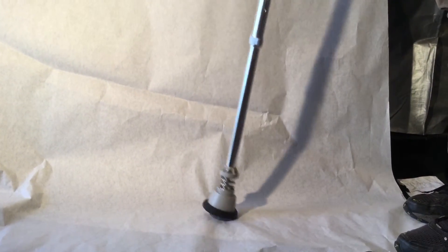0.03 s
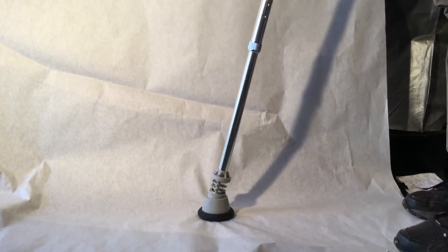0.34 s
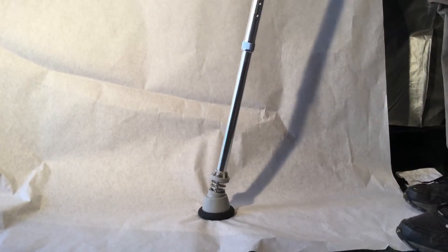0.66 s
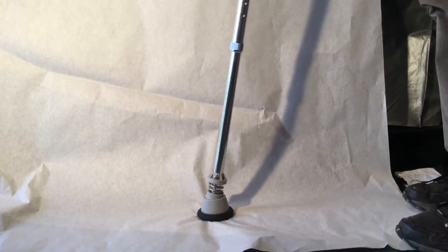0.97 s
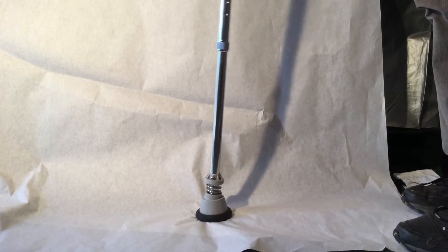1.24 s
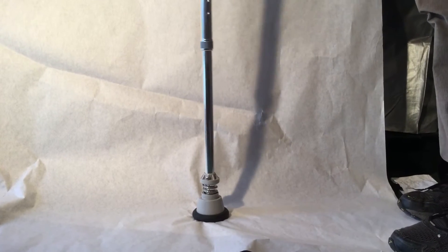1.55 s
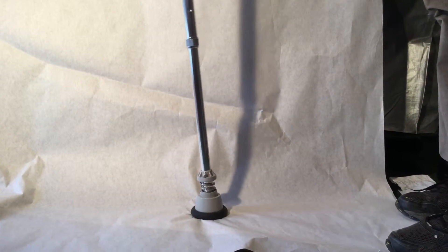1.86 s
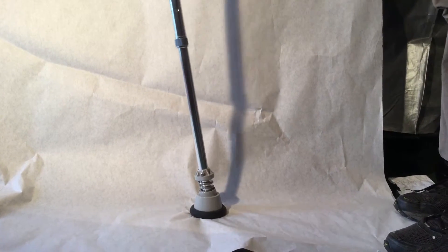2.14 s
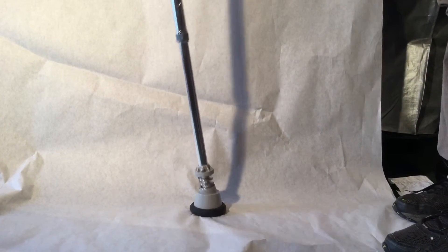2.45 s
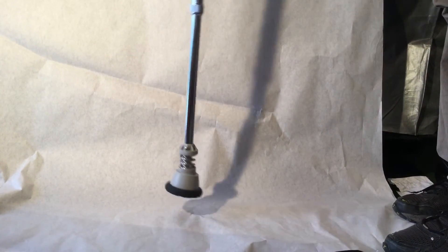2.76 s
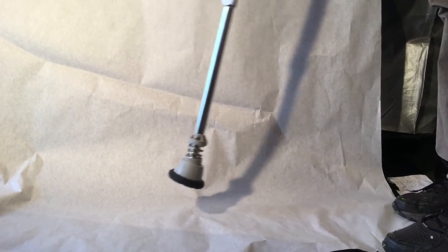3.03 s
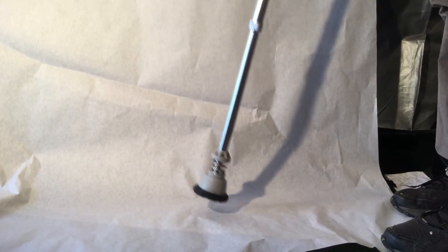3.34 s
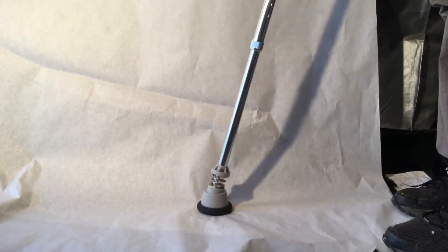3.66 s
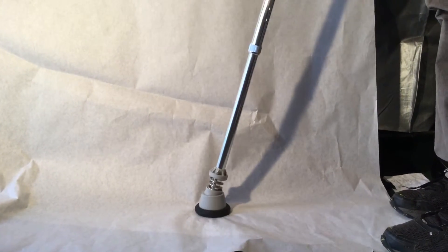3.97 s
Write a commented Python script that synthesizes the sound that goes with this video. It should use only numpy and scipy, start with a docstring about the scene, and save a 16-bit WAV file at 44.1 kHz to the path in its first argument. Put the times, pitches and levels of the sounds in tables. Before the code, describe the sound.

A rubber crutch tip lands on a paper-covered floor at about 0.2 seconds with a dull thump, crunch and sharp clicks. It rocks over with short creaks, scattered clicks and a faint rubbing hiss, quieter after 1.3 seconds. Paper crackles as it lifts around 2.5 seconds. A few clicks precede a second crunching thump at 3.6 seconds. Low ventilation rumbles steadily in the small room.

```python
"""In a small room with a paper-covered floor, a rubber crutch tip is planted, rocks over under load,
lifts and is planted again. Each impact excites the floor's damped modes and crushes the paper.
Creases and the sprung joint click; the loaded tip creaks by stick-slip friction and rubs with a
fine hiss. The room reverberates briefly over a steady ventilation rumble."""
import sys
import numpy as np
from scipy import signal
from scipy.fft import rfft, irfft
from scipy.io import wavfile
from scipy.ndimage import map_coordinates

SR = 44100
rng = np.random.default_rng(int(sys.argv[2]) if len(sys.argv) > 2 else 0)


def wav_out(sig):
    """Save sig, one row per channel (or a flat mono array), as 16-bit PCM at SR to the path in sys.argv[1]."""
    wavfile.write(sys.argv[1], SR, np.round(np.clip(np.atleast_2d(sig).T, -1, 1) * 32767).astype(np.int16))


N = 176400

# Reverberation of the room. Each row: frequency in Hz, time to decay by 60 dB (t60) in seconds.
ROOM_T60 = [(150, 0.544), (1000, 0.167), (9000, 0.136), (15000, 0.214)]
ROOM_ONSET_S, PLANTING_ROOM_DB = 0.00315, -4
LEAD_S = 0.02  # build-up ahead of each crack
EDGE_ATTACK_S, EDGE_RAGGED_DB = 0.00063, 2.5  # the paper gives way fibre by fibre


def thuds():
    """Impact excitation: the rubber sole slaps the paper and sets the floor's damped modes ringing."""
    # Landings of the tip. Each row: start in seconds, level in dB.
    landings = [(.164, -33.5), (3.581, -33.5)]
    # Floor modes. Each row: frequency in Hz, relative level in dB, t60 in seconds.
    floor_modes = [(95, -0.5, 0.105), (216.3, 1, 0.1022), (269.7, -0.5, 0.0863), (559.4, -5, 0.054)]
    out, t = np.zeros(N), np.arange(SR // 4) / SR
    for start, db in landings:
        ring = sum(amp(mode_db - 60 * t / t60) * np.sin(2 * np.pi * hz * t)
                   for hz, mode_db, t60 in floor_modes)
        add(out, start, amp(db) * ring * (1 - np.exp(-t / 0.003)))
        slap = crack((351, 1036), t60=0.031, room_db=PLANTING_ROOM_DB,
                     attack_s=EDGE_ATTACK_S, ragged_db=EDGE_RAGGED_DB)
        add(out, start - LEAD_S, amp(db + 1) * slap)
    return out


def crushes():
    """Superposition of impulses: paper under a changing load gives way in dense grains, a crunch."""
    # Load changes. Each row: end of the rise in seconds, seconds per 20 dB of rise, hold in seconds,
    # release t60 in seconds, relative level in dB, treble offset in dB.
    loads = [(0.163, 0.013, 0.012, 0.019, -35.5, 2.5), (0.199, 0.0335, 0.0724, 0.14, -39, -2.5),
             (0.407, 0.0198, 0.0122, 0.1026, -46.5, 0), (0.594, 0.047, 0.0229, 0.0264, -46, -5),
             (0.748, 0.0453, 0.0163, 0.04, -45.5, -11.5), (2.17, 0.0053, 0.0139, 0.0044, -46, -6),
             (2.293, 0.0114, 0.0087, 0.0169, -50, -9.5), (2.531, 0.07, 0.0203, 0.2785, -39.5, -6.5),
             (3.253, 0.0112, 0.0153, 0.12, -46.5, -4.5), (3.574, 0.011, 0.0174, 0.182, -35.5, 1.5),
             (3.62, 0.0176, 0.1266, 0.18, -39, -1.5)]
    # Spectra of the crunch's body and treble. Each row: frequency in Hz, relative level in dB.
    body_spectrum = [(100, -21), (220, 5), (500, 0), (1300, 2.5), (2500, -2), (4000, -9), (7000, -22),
                     (11000, -27.5), (15000, -48.5)]
    treble_spectrum = [(2500, -35.5), (5000, 0.5), (7300, -1.5), (9000, -2.5), (11800, -3), (15000, -22.5)]
    t, body_power, treble_power = np.arange(N) / SR, np.zeros(N), np.zeros(N)
    for start, attack, hold, release, db, treble_db in loads:
        before, after = np.maximum(start - t, 0), np.maximum(t - start - hold, 0)
        push = amp(db - 20 * before / attack - 60 * after / release)
        body_power += push ** 2
        treble_power += (push * amp(treble_db - 5)) ** 2
    crunch = np.zeros(N)
    for power, spectrum in (body_power, body_spectrum), (treble_power, treble_spectrum):
        fibres = grains(per_s=2200, spread_db=2)
        crunch += np.sqrt(power) * unit(coloured(fibres, spectrum))
    clumps = amp(2.5 * wobble(per_s=140) - 3)
    return with_room(clumps * crunch, PLANTING_ROOM_DB)[:N]


def clicks():
    """Transient excitation: creases and the sprung joint click; the floor and metal tube respond."""
    # Clicks. Each row: start in seconds, then relative body, middle, treble and room levels in dB.
    snaps = [(0.0621, -46.5, -47.5, -47, -4), (0.1074, -43.5, -37, -33.5, -5.5),
             (.158, -47, -38, -35.5, -0.5), (0.1677, -37, -39.5, -29.5, -2.5),
             (0.1935, -45, -41, -37, -4.5), (0.5454, -51.5, -48, -55, -0.5), (0.9544, -40, -40, -34, -3),
             (1.1784, -39, -33, -32.5, 0), (1.193, -46, -47, -36, -5.5), (1.4676, -49.5, -42, -62.5, -3.5),
             (1.922, -58.5, -53, -60.5, -5.5), (2.175, -48.5, -51.5, -45.5, 0),
             (2.453, -49.5, -48.5, -43.5, -3.5), (2.5446, -44, -39.5, -37.5, -5), (3, -67, -63.5, -52, -12),
             (3.206, -58, -63, -56, 2), (3.2426, -40.5, -39, -34, -4.5), (3.3439, -48.5, -50, -46.5, 1),
             (3.3966, -51.5, -53.5, -53, -0.5), (3.571, -41.5, -33, -31.5, -11.5),
             (3.583, -34.5, -41.5, -23.5, -5), (3.6206, -38.5, -38.5, -36, -2),
             (3.6574, -54.5, -42, -36.5, -11), (3.675, -46, -36, -34.5, -9), (3.687, -44, -42, -31.5, 0)]
    # Body, middle and treble bands. Each row: lower edge in Hz, upper edge in Hz.
    bands = [(950, 2490), (2700, 8250), (7900, 13970)]
    # Modes of the tube. Each row: frequency in Hz, relative level in dB.
    tube_modes = [(1400, -2.5), (1800, -3), (2180, 0), (2719, -7), (3650, -3), (6000, -8.5)]
    tube_db, tube_t60 = -14.5, 0.141
    out, t = np.zeros(N), np.arange(SR // 4) / SR
    for start, *band_db, room_db in snaps:
        click = sum(amp(db) * crack(band, t60=0.01084, room_db=room_db)
                    for db, band in zip(band_db, bands))
        floor = amp(band_db[0] - 6) * crack((306, 890), t60=0.0504, room_db=room_db, attack_s=0.0041)
        add(out, start - LEAD_S, click + floor)
        ring = sum(amp(db + rng.normal(0, 3.0)) * np.sin(2 * np.pi * hz * t) for hz, db in tube_modes)
        add(out, start, ring * amp(band_db[1] + room_db + tube_db - 60 * t / tube_t60))
    return amp(1) * out


def creaks():
    """Stick-slip friction: each jerk of the loaded tip is a damped knock with a ragged, papery edge."""
    # Slips. Each row: start in seconds, relative knock and edge levels in dB, pitch in Hz.
    slips = [(0.354, -47.5, -74, 938), (.3706, -48, -73, 823), (.3942, -45, -61, 855),
             (0.423, -39.5, -50, 922), (0.512, -45.5, -61, 770), (.5285, -46, -67, 728),
             (0.5899, -41.5, -45, 710), (.7436, -47, -55.5, 623), (0.7673, -42, -43.5, 1164),
             (1.0218, -49.5, -75.5, 850), (1.7843, -44.5, -53.5, 960), (1.8425, -51, -61, 740),
             (1.947, -50, -51.5, 768), (2.2865, -46.5, -67.5, 848), (2.443, -38.5, -46.5, 739),
             (2.8708, -53.5, -72.5, 1620), (3.134, -51.5, -55, 903), (3.516, -48, -59, 1270)]
    t60, room_db, band_ratio = 0.0183, -2, 1.74
    out, t = np.zeros(N), np.arange(SR // 4) / SR
    for start, knock_db, edge_db, hz in slips:
        envelope = amp(-60 * t / t60) * (1 - np.exp(-t / EDGE_ATTACK_S))
        knock = struck(np.sin(2 * np.pi * hz * t) * envelope)
        add(out, start, 0.612 * amp(knock_db) * knock)
        scuff = crack((hz / band_ratio, hz * band_ratio), t60, room_db, EDGE_ATTACK_S)
        edge = crack((470, 7880), t60, room_db, EDGE_ATTACK_S, EDGE_RAGGED_DB)
        add(out, start - LEAD_S, 0.782 * amp(knock_db) * scuff + amp(edge_db) * edge)
    return amp(1) * out


def rubbing():
    """Sliding friction: the rocking tip drags on the sheet, hissing over tiny ringing crinkles."""
    # Envelopes of the hiss and the low rustle. Each row: time in seconds, level in dB.
    hiss_levels = [(0, -68.5), (.35, -68), (.47, -57), (.85, -55), (.98, -58.5), (1.07, -70), (1.35, -76),
                   (1.7, -72), (1.86, -63.5), (2.13, -67.5), (2.3, -62), (2.53, -55), (2.66, -86.5),
                   (3.5, -78), (3.79, -65.5), (3.88, -62), (4, -51.5)]
    rustle_levels = [(0, -59.5), (1.04, -56.5), (1.15, -69), (1.4, -71.5), (1.56, -60), (1.72, -69),
                     (1.95, -60), (2.2, -68), (2.62, -57.5), (2.75, -65.5), (3.85, -63.5), (4, -52)]
    # Spectrum of the hiss. Each row: frequency in Hz, relative level in dB.
    hiss_spectrum = [(500, -8.5), (2000, -12), (7300, -10.5), (8800, -4), (11600, -0.5), (13500, -1),
                     (15500, -9.5)]
    crinkle_band_hz, crinkle_t60 = (349, 2283), 0.00733
    crinkles, t = np.zeros(N), np.arange(SR // 20) / SR
    kicks = grains(per_s=260, spread_db=4.5)
    pitch = np.exp(rng.uniform(*np.log(crinkle_band_hz), N))
    for i in np.flatnonzero(kicks):
        add(crinkles, i / SR, kicks[i] * np.sin(2 * np.pi * pitch[i] * t) * amp(-60 * t / crinkle_t60))
    rustle = unit(with_room(crinkles, room_db=1)[:N])
    return level(hiss_levels) * noise(hiss_spectrum) + level(rustle_levels) * rustle


def ventilation():
    """Resonance: steady ventilation noise rumbles in the room's low modes, with a faint rush of air."""
    # Spectra of the rumble and the air. Each row: frequency in Hz, relative level in dB.
    rumble_spectrum = [(20, -38), (45, -26), (70, -13.5), (97, -2.5), (115, -3.5), (135, 1.5), (155, 1.5),
                       (175, -18), (192, -5.5), (222, -24.5), (240, -17.5), (262, -26), (400, -39),
                       (700, -63)]
    air_spectrum = [(100, -11), (300, 3.5), (600, -0.5), (1200, -5), (2100, -6), (3200, -17.5),
                    (6000, -18.5), (12000, -18), (16000, -11.5)]
    return amp(-41.5) * noise(rumble_spectrum) + amp(-63.5) * noise(air_spectrum)


def crack(band_hz, t60, room_db, attack_s=0.000169, ragged_db=0):
    """Release of strain: band noise builds faintly, bursts at LEAD_S and leaves a diffuse echo."""
    clock = np.arange(SR // 4) / SR - LEAD_S
    t = np.maximum(clock, 0)
    strain = amp(-18.5) * np.exp(-np.abs(clock) / 0.00666)
    tearing_db = ragged_db * wobble(per_s=496, size=len(t))
    direct = struck(amp(tearing_db - 60 * t / t60) * (1 - np.exp(-t / attack_s)))
    echo_t60 = along(ROOM_T60, np.mean(band_hz))
    echo = struck(amp(-60 * t / echo_t60) * (1 - np.exp(-(t / ROOM_ONSET_S) ** 2)))
    bandpass = signal.butter(2, band_hz, "band", fs=SR, output="sos")
    carrier = unit(signal.sosfilt(bandpass, rng.standard_normal(len(t))))
    return carrier * np.hypot(direct + strain, amp(room_db) * echo)  # incoherent parts add in power


def with_room(x, room_db):
    """Reverberation: convolution with a diffuse tail whose decay depends on frequency."""
    hz, t, spectra = signal.stft(rng.standard_normal(SR // 3), SR, nperseg=256)
    decay = amp(-60 * t / along(ROOM_T60, hz)[:, None])
    response = signal.istft(spectra * decay, SR, nperseg=256)[1]
    response *= 1 - np.exp(-(np.arange(len(response)) / SR / ROOM_ONSET_S) ** 2)
    response *= amp(room_db) / np.linalg.norm(response)
    response[0] += 1  # direct sound
    return signal.fftconvolve(x, response)


def coloured(x, points, top_hz=SR):
    """Minimum-phase filtering to a shape of (Hz, dB) points, cut off at top_hz."""
    size = 2 ** 18
    hz = np.fft.rfftfreq(size, 1 / SR)
    cepstrum = irfft(np.log(amp(along(points, hz))))
    cepstrum[1:size // 2] *= 2  # folding onto positive time makes the shape causal
    cepstrum[size // 2 + 1:] = 0
    return irfft(rfft(x, size) * np.exp(rfft(cepstrum)) * (hz < top_hz))[:N]


def noise(points):
    """Spectrally shaped Gaussian noise of rms 1."""
    return unit(coloured(rng.standard_normal(N), points))


def grains(per_s, spread_db):
    """A Poisson train of impulses of random sign and log-normal size."""
    chance, size, sign = rng.random(N), rng.standard_normal(N), rng.choice([-1, 1], N)
    return (chance < per_s / SR) * sign * amp(spread_db * size)


def wobble(per_s, size=N):
    """Smooth modulation: a spline through random knots."""
    knots = rng.standard_normal(int(size * per_s / SR) + 4)
    return map_coordinates(knots, [np.arange(size) * per_s / SR])


def amp(db):
    """Decibels to amplitude ratio."""
    return 10 ** (np.asarray(db) / 20)


def unit(x):
    """Power normalisation to rms 1."""
    return x / np.sqrt(np.mean(x ** 2) + 1e-20)


def struck(x):
    """Energy normalisation to that of 3 ms at rms 1."""
    return x / np.sqrt(np.sum(x ** 2) / (0.003 * SR))


def along(points, hz):
    """Interpolation of (Hz, value) points on a logarithmic frequency axis."""
    frequencies, values = np.transpose(points)
    return np.interp(np.log(hz + 1), np.log(frequencies + 1), values)


def level(points):
    """Amplitude envelope through (seconds, dB) points."""
    return amp(np.interp(np.arange(N) / SR, *np.transpose(points)))


def add(track, start, sound):
    """Superposition of a sound on the track, from start in seconds."""
    part = track[max(round(start * SR), 0):][:len(sound)]
    part += sound[:len(part)]


def scene():
    """Linear superposition: the pressures of all sources add in one channel."""
    return (clicks() + creaks() + thuds() + crushes() + rubbing() + ventilation())[None]


def record(dry):
    """Spectral shaping: a bright, uneven treble colour lies over the whole mix; the very top is cut."""
    # Treble colour of the whole mix. Each row: frequency in Hz, gain in dB.
    treble_colour = [(5200, 0), (5700, -1.5), (6400, 0.5), (7300, -4), (8400, 2), (9200, 1.5), (10200, -3),
                     (11500, -0.5), (13000, -6.5), (15500, -13.5)]
    return coloured(dry[0], treble_colour, top_hz=15500)[None]


dry = scene()
out = record(dry)
wav_out(out)
```